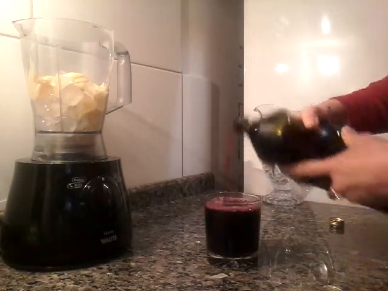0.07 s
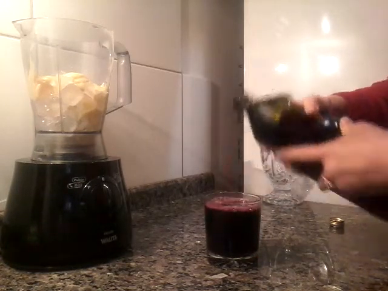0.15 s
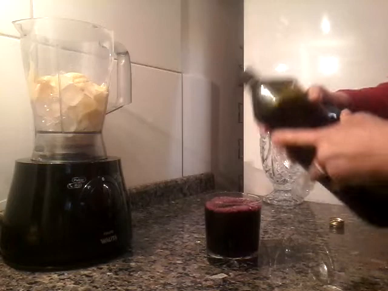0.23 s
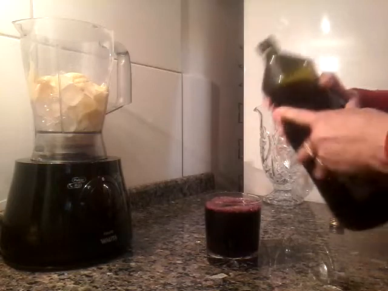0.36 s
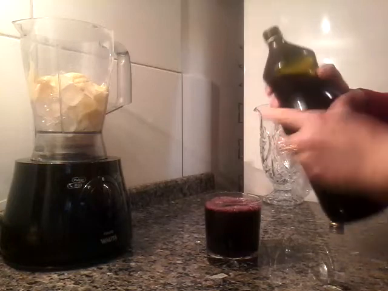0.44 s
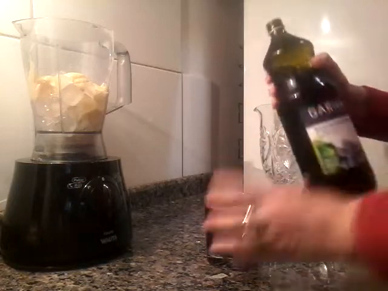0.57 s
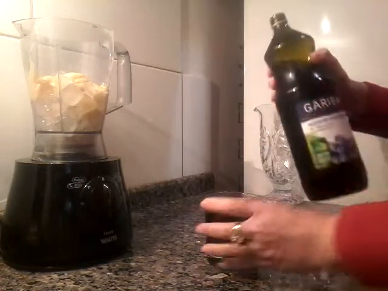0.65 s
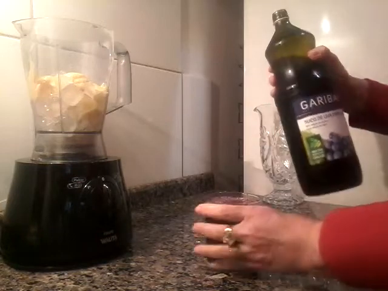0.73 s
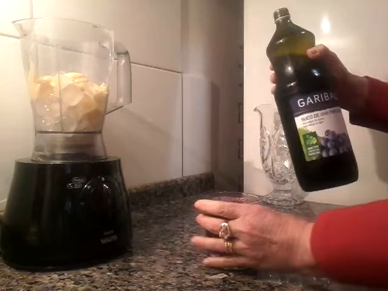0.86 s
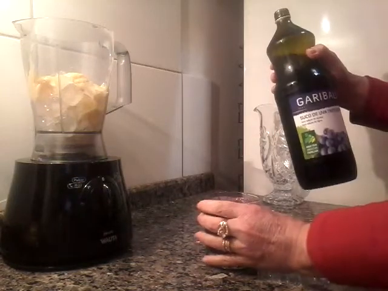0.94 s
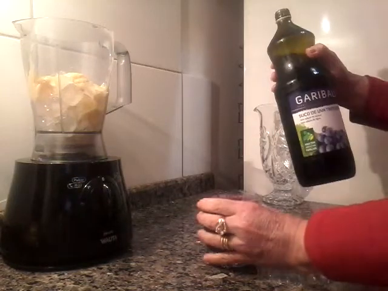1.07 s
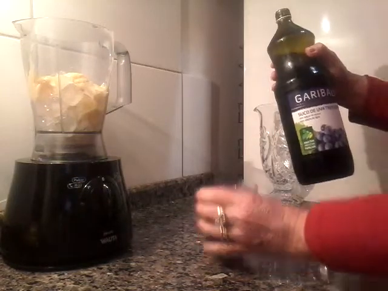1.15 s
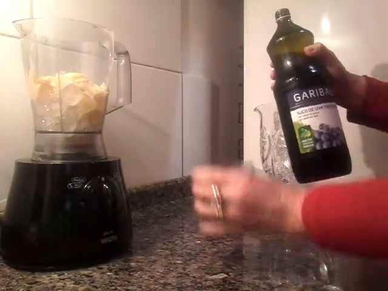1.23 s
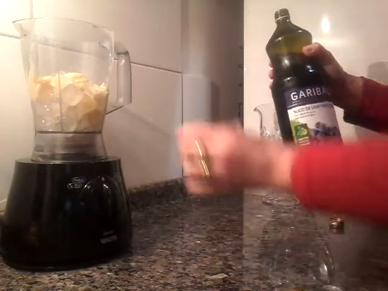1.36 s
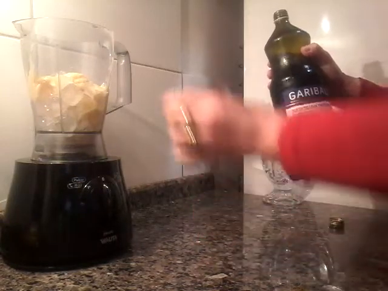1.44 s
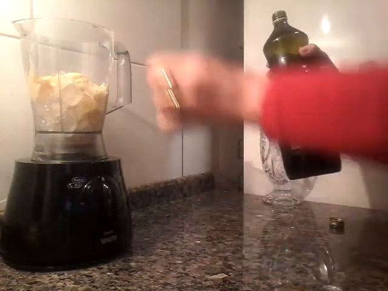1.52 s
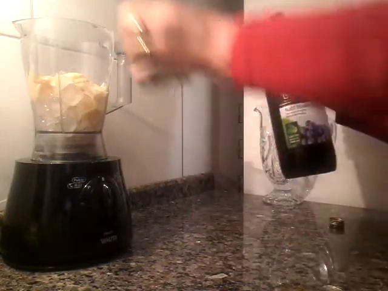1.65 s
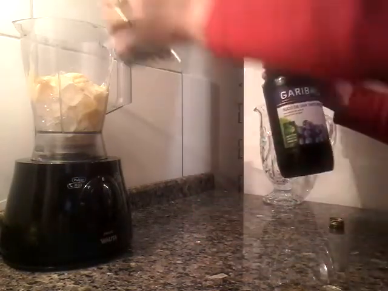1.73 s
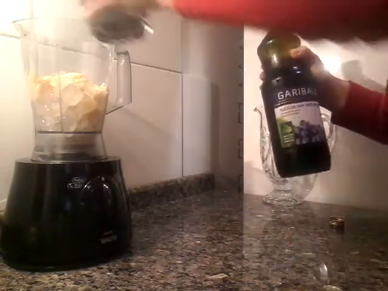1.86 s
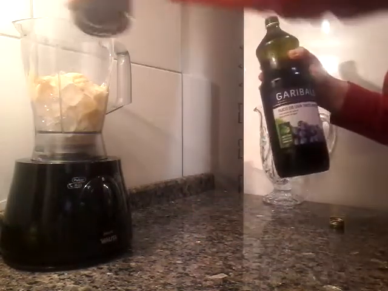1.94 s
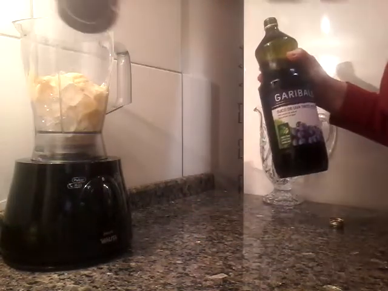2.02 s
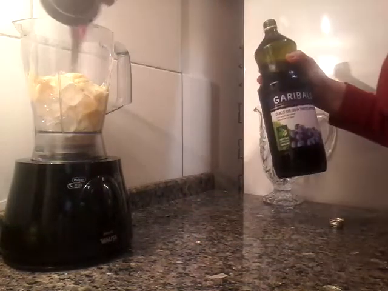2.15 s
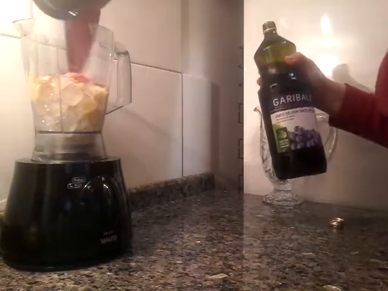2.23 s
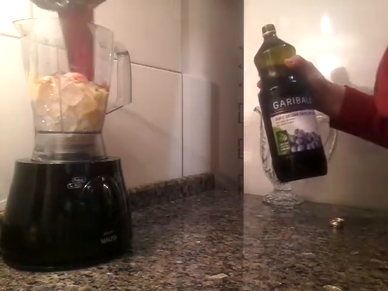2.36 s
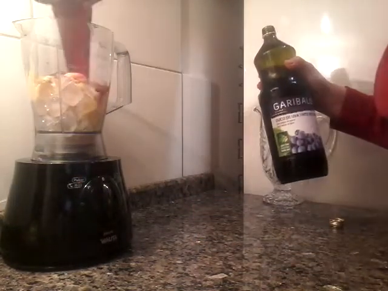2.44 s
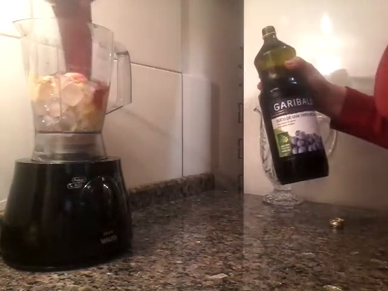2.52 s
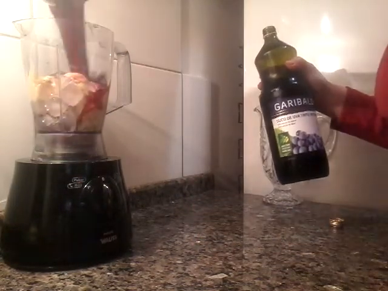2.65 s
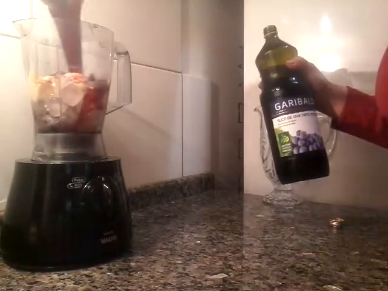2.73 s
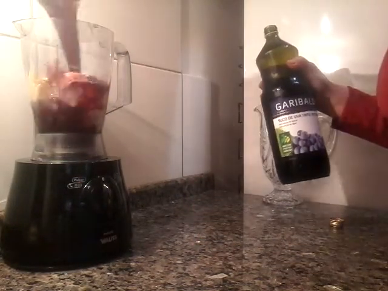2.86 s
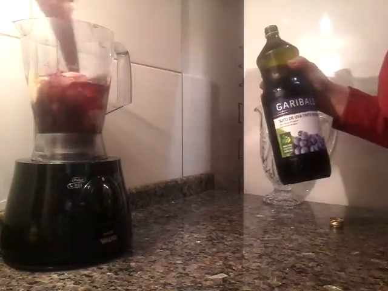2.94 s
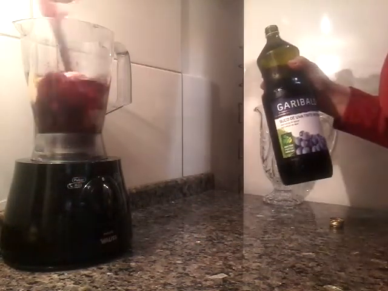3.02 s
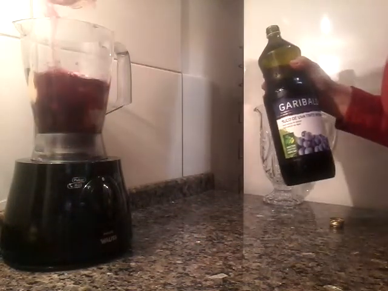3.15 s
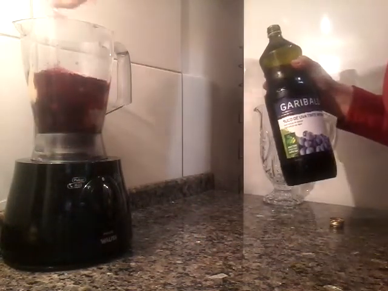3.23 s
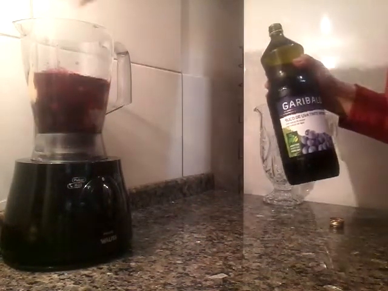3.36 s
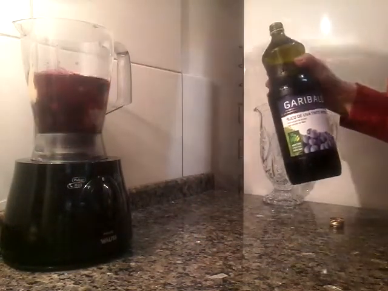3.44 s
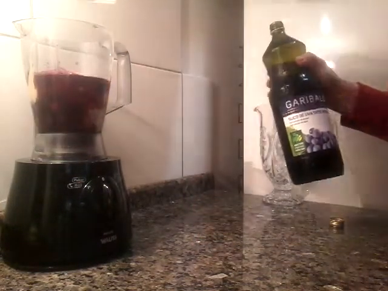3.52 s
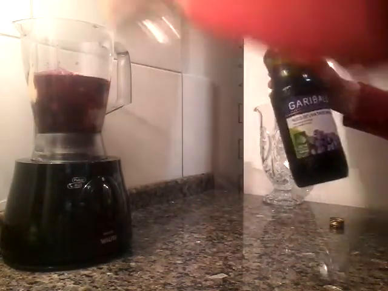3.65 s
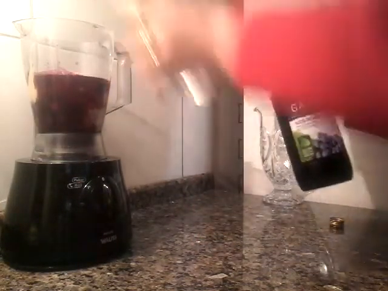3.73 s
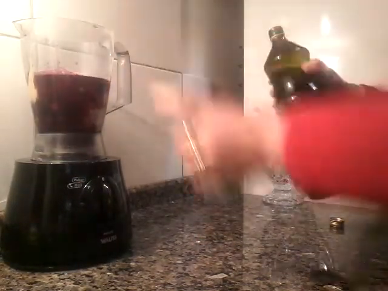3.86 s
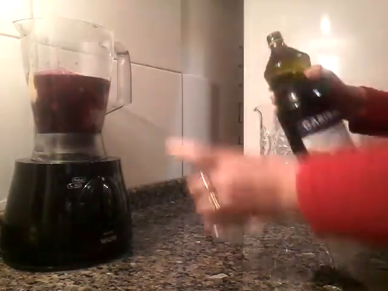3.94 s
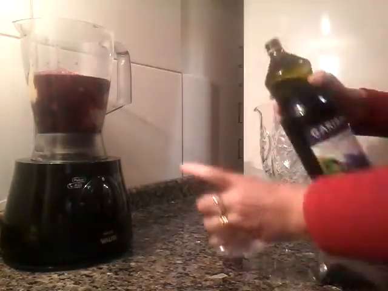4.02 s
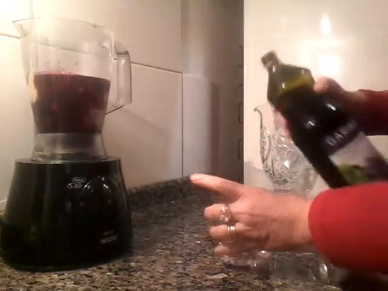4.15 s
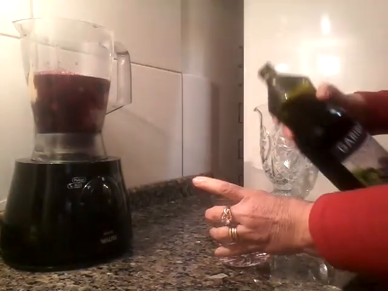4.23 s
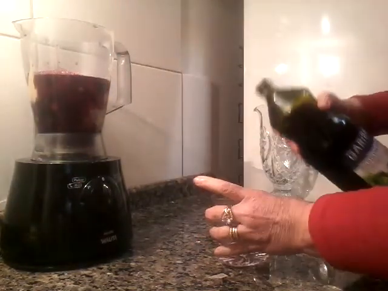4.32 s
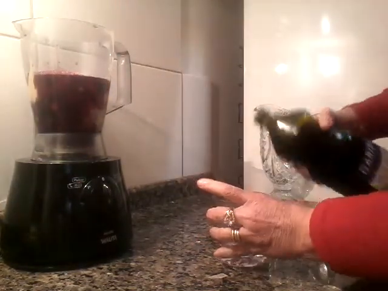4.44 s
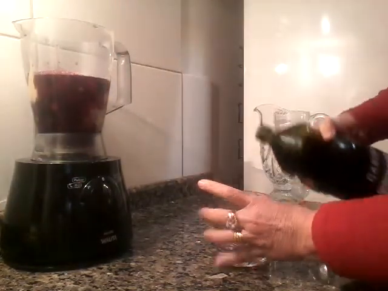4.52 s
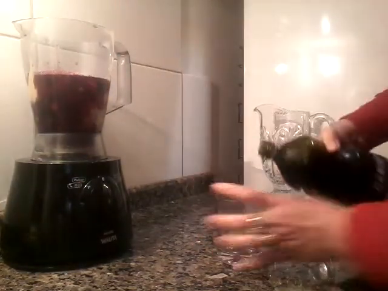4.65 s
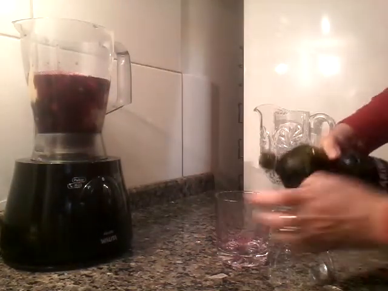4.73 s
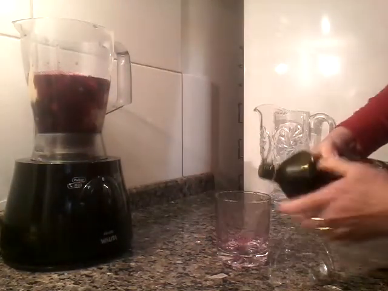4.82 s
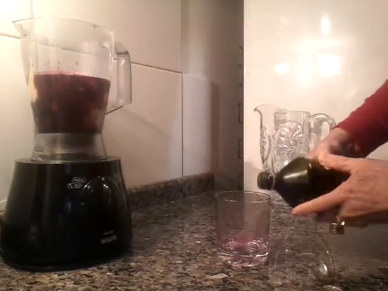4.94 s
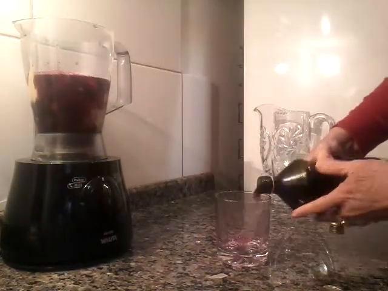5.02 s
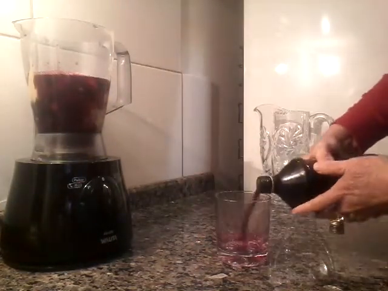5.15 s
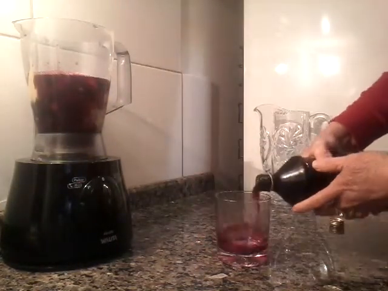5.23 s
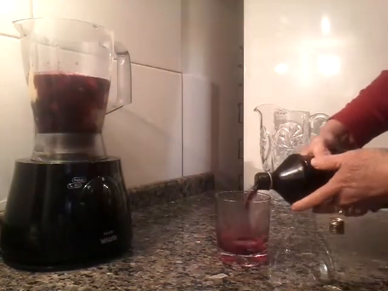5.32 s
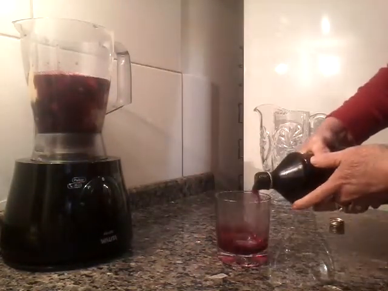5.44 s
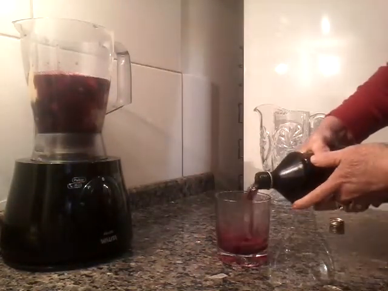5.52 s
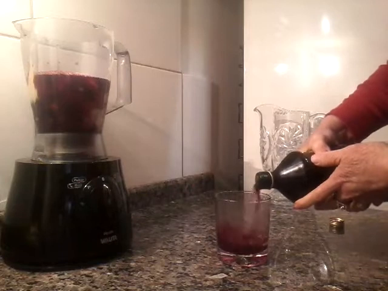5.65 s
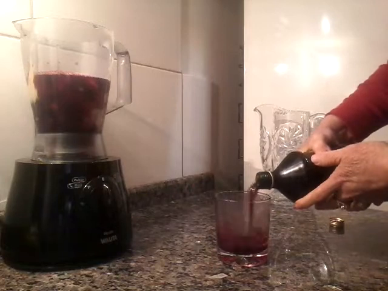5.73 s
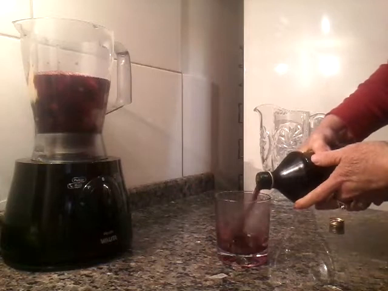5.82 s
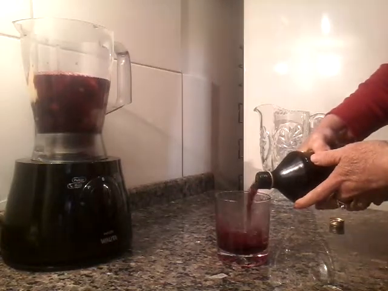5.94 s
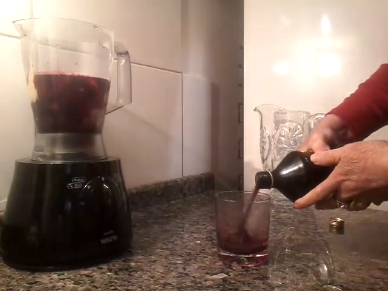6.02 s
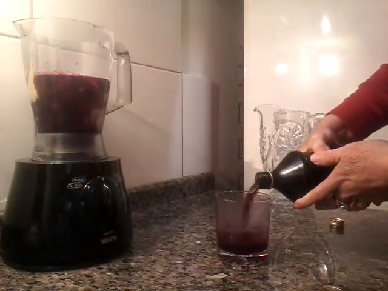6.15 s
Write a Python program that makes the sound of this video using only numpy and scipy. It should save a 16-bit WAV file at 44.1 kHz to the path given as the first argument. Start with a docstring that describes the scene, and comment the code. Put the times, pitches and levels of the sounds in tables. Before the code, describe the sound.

A few last soft glugs of juice leave a glass bottle, followed by light taps of a drinking glass being handled. The juice then rushes over fruit and ice in a blender jar, splashing and gurgling for about a second. After faint drips, the glass knocks twice on a stone counter and the bottle once, each with a short ring. The bottle starts glugging into the glass again. The sound is close, in a quiet tiled kitchen.

```python
"""The tiled corner of a kitchen, where grape juice is poured. The last glugs leave a bottle, then the full
glass is tipped over fruit and ice in a blender jar: ringing bubbles and a spray of tiny clicks. The empty
glass knocks twice on the stone counter and the bottle once, each with a thud, a ring and a low boom, and
the bottle starts to glug into the glass again. Foam fizzes in the jar and an appliance hums faintly."""
import sys
import numpy as np
from scipy import signal
from scipy.fft import rfft, irfft
from scipy.io import wavfile
from scipy.ndimage import uniform_filter1d

SR = 44100
rng = np.random.default_rng(int(sys.argv[2]) if len(sys.argv) > 2 else 0)


def waveform_to_disk(signal):
    """Save audio, clipped to [-1, 1], as 16-bit WAV at the path in sys.argv[1]."""
    frames = np.transpose(np.atleast_2d(signal))
    scaled = np.clip(frames, -1, 1) * 32767
    samples = np.round(scaled).astype(np.int16)
    wavfile.write(sys.argv[1], SR, samples)


N = 272538
TIME = np.arange(N) / SR


# The pour from the tipped glass into the jar. Each row: time in seconds, relative level in dB.
POUR_ENVELOPE = [(2.2, -65), (2.285, -49.5), (2.335, -38), (2.52, -42), (2.79, -40.5), (3.09, -45.5),
                 (3.2, -67), (3.48, -69.5), (3.55, -98)]

def stream(pool_start_s=2.25, pool_fill_s=0.22):
    """Juice hits fruit and ice as fine spray; as it pools, the spray softens and deep bubbles swell."""
    flow = from_db(np.interp(TIME, *np.transpose(POUR_ENVELOPE), left=-120, right=-120))
    pool = 1 - np.exp(-np.maximum(TIME - pool_start_s, 0) / pool_fill_s)
    gurgle = swarm(POUR_ENVELOPE, 226.7, 1164, cycles=33, spread_db=1, rise=0.045, count=700, tone=jar)
    splatter = swarm(POUR_ENVELOPE, 1241, 5850, cycles=90, spread_db=4, rise=0.04, count=3600, tone=jar)
    mist = swarm(POUR_ENVELOPE, 6270, 15460, cycles=130, spread_db=6.5, rise=0.033, count=6000, tone=jar)
    return flow * (from_db(-20 + 10 * pool) * gurgle
                   + from_db(-1.5 - 3 * pool) * splatter
                   + from_db(-5 - 3.5 * pool) * mist)


# The tone of splashing in the jar. Each row: frequency in Hz, gain in dB.
JAR_EQ = [(220, 7.5), (300, -5), (600, 4), (820, -3.5), (1000, 6), (1250, -7), (1700, 3.5), (3300, 2),
          (5500, 1.5), (9000, 2.5), (11000, -0.5), (15000, -6.5)]
# The jar's air column as it fills. Each row: time in seconds, first and second resonance in Hz.
JAR_RESONANCES = [(2.3, 432, 1380), (2.5, 435, 1630), (2.7, 666, 1690), (3.1, 757, 1650)]

def jar(s, hz, boost_db=11, sharpness=14):
    """Gain in dB for a bubble in the jar: it is louder near a resonance of the air column."""
    times, *resonances = np.transpose(JAR_RESONANCES)
    detunings = [np.log(hz / np.interp(s, times, sweep)) for sweep in resonances]
    return at_hz(JAR_EQ, hz) + sum(boost_db / (1 + (sharpness * detune) ** 2) for detune in detunings)


# Juice slapping down. Each row: start in seconds, relative spray and body levels in dB, bubble pitch in Hz.
SPLASH_CUES = [(.094, -40.5, -48, 1333), (.117, -32.5, -51.5, 1406), (.176, -33, -42.5, 2390),
               (.374, -52, -60, 2110), (.465, -47.5, -61.5, 2070), (.512, -51.5, -68, 2140),
               (.6, -63, -64, 4540), (2.219, -43, -48.5, 3520), (2.23, -32.5, -50, 1760),
               (2.292, -25, -39.5, 2466), (2.316, -29.5, -28.5, 3370), (2.349, -28, -30, 1560),
               (2.396, -31.5, -31.5, 1600), (2.612, -35.5, -35, 1800), (2.755, -50, -34, 2134),
               (2.823, -33.5, -60, 1680), (2.894, -35.5, -41, 1760), (3.025, -29.5, -60, 1680),
               (3.119, -35, -44, 3300), (5.396, -53.5, -71, 4120), (5.447, -51, -44, 4250),
               (5.6, -57, -54, 4570), (5.654, -45, -41.5, 4480), (5.669, -43, -37, 2595),
               (5.814, -48.5, -55, 4840), (5.872, -33.5, -33.5, 2730), (6.025, -39.5, -46, 2690),
               (6.078, -39.5, -56, 2230), (6.097, -38.5, -35.5, 2890)]

def splashes(level_db=-4):
    """A film of juice breaks into spray and traps a cluster of small bubbles and one lead bubble."""
    out = np.zeros(N)
    for s, spray_db, body_db, hz in SPLASH_CUES:
        add(out, s, from_db(spray_db) * spray(decay_s=0.0059))
        add(out, s, from_db(body_db - 1) * cluster(1990, 7860, decay_s=0.0074, cycles=174, count=26))
        add(out, s, from_db(body_db + 3) * bubble(hz, t60=110 / hz, rise=0.18, pinch_s=0.00021))
    return from_db(level_db) * out


# Big gurgles in the jar. Each row: start in seconds, pitch in Hz, relative level in dB.
POCKET_CUES = [(2.368, 1640, -36), (2.572, 359, -36.5), (2.68, 635, -33.5), (2.691, 1626, -32),
               (2.764, 561, -28.5), (2.79, 2040, -34), (3.096, 3340, -35)]

def air_pockets(level_db=-8.5):
    """The stream drags pockets of air under, and each stands out as a gulp."""
    out = np.zeros(N)
    for s, hz, db in POCKET_CUES:
        add(out, s, from_db(db) * gulp(hz, decay_s=0.013, lead_db=8.5, lead_t60=0.031))
    return from_db(level_db) * out


# Air glugging into the bottle. Each row: start in seconds, pitch in Hz, relative level in dB.
GLUG_CUES = [(0, 1100, -62), (0.18, 1774, -56), (0.208, 1103, -57.5), (5.656, 1290, -52), (5.909, 932, -50),
             (6.099, 1140, -42.5)]

def glugs(level_db=0.5, bottle_air_hz=836):
    """Each gulp at the neck also sets the air in the bottle ringing."""
    out = np.zeros(N)
    for s, hz, db in GLUG_CUES:
        add(out, s, from_db(db) * gulp(hz, decay_s=0.033, lead_db=10.5, lead_t60=0.0605))
        add(out, s, from_db(db + 0.5) * bubble(bottle_air_hz, t60=0.16, rise=0.2, pinch_s=0.012))
    return from_db(level_db) * out


# The pour pulsing at the bottle neck. Each row: start in seconds, relative level in dB.
NECK_PULSES = [(5.3, -51.5), (5.531, -51), (5.752, -46.5), (5.953, -43), (6.145, -52)]

def plops(level_db=-2, plop_hz=347, tick_hz=4420):
    """The neck closes with a low plop, a bright tick and a little spray."""
    out = np.zeros(N)
    for s, db in NECK_PULSES:
        tick = bubble(tick_hz * rng.uniform(0.9, 1.3), t60=0.017, rise=0.34, pinch_s=0.0004)
        add(out, s, from_db(db) * bubble(plop_hz, t60=0.043, rise=0.1, pinch_s=0.00036))
        add(out, s, from_db(db + 6.5) * tick)
        add(out, s, from_db(db - 3) * spray(decay_s=0.0025))
    return from_db(level_db) * out


def trickle(steady_db=-70, fall_s=0.096, swell_s=0.067):
    """Tiny bubbles fizz in the glass, swelling as a slug of juice lands after each pulse of the neck."""
    level = from_db(steady_db)
    for s, db in NECK_PULSES:
        age = np.maximum(TIME - s - fall_s, 0) / swell_s
        level = level + from_db(db - 8) * age * np.exp(1 - age ** 2) / 2
    fizz = swarm(NECK_PULSES, 1245, 13000, cycles=35, spread_db=5, rise=0.087, count=420)
    return level * butter(fizz, 4700, "low", order=1)


# Glass and bottle hitting the counter. Each row: start in seconds, relative thud level in dB,
# thud cut-off in Hz, then relative levels in dB of the glass ring, bottle ring and counter boom.
KNOCK_CUES = [(4.2478, -18, 2690, -4, -63, -51), (4.2635, -28, 2920, -29, -27, -30.5),
              (4.521, -25.5, 3140, -16, -31.5, -38.5), (4.5265, -38, 3300, -34, -54, -35.5),
              (5.073, -25, 3280, -32, -14, -29.5)]
# The modes of glass, bottle and counter. Each row: pitch in Hz, relative level in dB, t60 in seconds.
GLASS_MODES = [(720, -18, .2), (892, -11, .25), (1006, -11, .25), (1130, -11, .28), (1205, -12, .2),
               (1380, -17, .27), (1552, -19, .27), (2098, -12, .26), (2177, 1, .16), (2214, -11, .32),
               (2402, -16, .2), (3176, -18, .2), (3708, -23, .2), (11990, -33, .09), (14380, -29, .07)]
BOTTLE_MODES = [(380, -13, .25), (688, -6, .18), (783, -11, .2), (996, -1, .19), (1305, -14, .17),
                (2190, -14, .36), (2246, -4, .22), (2933, -2, .2), (3288, -8, .2), (3723, -11, .22),
                (4290, -25, .25), (4950, -26, .4), (5793, -22, .18), (6200, -26, .15), (9012, -31, .13),
                (10780, -31, .12)]
COUNTER_MODES = [(116.6, -2, 0.37), (135.2, -10.5, 0.5), (241.3, 10, 0.052), (252.4, 11, 0.2),
                 (373, -12, 0.14), (460.6, 0, 0.41)]

def knocks(level_db=-10, attack_s=0.0017):
    """Each blow sets the glassware ringing and the counter booming."""
    out = np.zeros(N)
    glass, bottle, counter = ring(GLASS_MODES), ring(BOTTLE_MODES), ring(COUNTER_MODES)
    for s, _, _, glass_db, bottle_db, boom_db in KNOCK_CUES:
        blow = from_db(glass_db) * glass + from_db(bottle_db) * bottle + from_db(boom_db) * counter
        add(out, s, blow * (1 - np.exp(-TIME[:SR] / attack_s)))
    return from_db(level_db) * out


# The dense ring of stone and glassware under a blow. Each row: frequency in Hz, gain in dB.
THUD_EQ = [(100, -17), (170, -36.5), (240, -35), (370, -4), (560, -7), (740, 0.5), (1100, 1), (1700, -4),
           (2300, 3.5), (3200, -2), (4600, -6.5), (6500, -14), (10000, -8.5), (15000, -1.5)]

def thuds(level_db=7, t60=0.048, attack_s=0.0014):
    """Glass meets stone: a dense, short thud, each with its own level and brightness."""
    out, t = np.zeros(N), TIME[:SR]
    envelope = die_away(t, t60) * (1 - np.exp(-t / attack_s))
    for s, db, cutoff_hz, *_ in KNOCK_CUES:
        thud = rms_one(butter(coloured_noise(THUD_EQ, SR), cutoff_hz, "low"))
        add(out, s, from_db(db) * thud * envelope)
    return from_db(level_db) * out


# Light taps. Each row: start in seconds, relative level in dB, rough pitch in Hz.
TAP_CUES = [(0.984, -49, 830), (1.058, -56.5, 5000), (1.372, -54, 1480), (3.296, -51, 765),
            (3.372, -52.5, 1350), (3.43, -51.5, 1150), (3.468, -50.5, 1550), (3.991, -43, 2300),
            (4.066, -48.5, 2720), (4.082, -46, 1900), (4.119, -52.5, 1440)]

def taps(level_db=-3, decay_s=0.00934):
    """Soft, short taps: glassware being handled, and drips or ice settling in the jar."""
    out, t = np.zeros(N), TIME[:SR // 4]
    for s, db, hz in TAP_CUES:
        tap = butter(rng.standard_normal(len(t)), [hz / 1.94, hz * 1.53], "band")
        add(out, s, from_db(db) * rms_one(tap) * np.exp(-t / decay_s))
    return from_db(level_db) * out


# The hand sliding on the glass. Each row: start in seconds, level in dB.
SWISH_CUES = [(1.001, -60), (4.113, -60.5)]

def swishes():
    """Skin slips over glass in many tiny catches: a thin swish."""
    out = np.zeros(N)
    for s, db in SWISH_CUES:
        add(out, s, from_db(db) * spray(decay_s=0.025, centre_hz=11000, attack_s=0.004))
    return out


# Dripping during and after the pours. Each row: start and end in seconds.
DRIP_SPANS = [(0.201, 1.5), (3.1, 3.7), (5.25, 6.18)]

def drips(level_db=-61, spread_db=2, drops_per_span=5):
    """Stray drops land at random moments as faint ticks."""
    out = np.zeros(N)
    for start, end in DRIP_SPANS:
        for s in rng.uniform(start, end, drops_per_span):
            add(out, s, from_db(level_db + spread_db * rng.standard_normal()) * spray(decay_s=0.0013))
    return out


def foam(start_s=3.2, start_db=-75, growth_db_per_s=1):
    """After the pour, tiny bubbles pop in the jar with a faint, high fizz that slowly grows."""
    pops = grains(per_s=340, spread_db=1, size=N)
    fizz = rms_one(resonate(pops, 10400, width_hz=2600))
    age = TIME - start_s
    return from_db(start_db + growth_db_per_s * age) * fizz * (age > 0)


# Early reflections off the tiles. Each row: delay in seconds, level in dB.
TILE_ECHOES = [(.0023, -27.5), (.0038, -24.5), (.0063, -38.5), (.0097, -19)]
# The reverb tail. Each row: frequency in Hz, t60 in seconds.
TAIL_DECAY = [(250, 0.48), (1000, 0.44), (2200, 0.39), (5000, 0.4), (10000, .24), (15000, 0.25)]

def kitchen(dry, tail_db, attack_s=0.00047):
    """Close tiled walls throw back a few echoes, then a diffuse tail that dies sooner in the treble."""
    t = TIME[:SR * 3 // 4]
    edges_hz, tail = np.geomspace(280, 18000, 9), 0
    for low, high in zip(edges_hz, edges_hz[1:]):
        band = butter(rng.standard_normal(len(t)), [low, high], "band")
        tail = tail + band * die_away(t, at_hz(TAIL_DECAY, np.sqrt(low * high)))
    tail = tail * (1 - np.exp(-t / attack_s))
    response = from_db(tail_db) * tail / np.sqrt(np.sum(tail ** 2))
    response[0] += 1   # the direct sound
    for s, db in TILE_ECHOES:
        add(response, s, from_db([db]))
    return signal.fftconvolve(dry, response)[:N]


# The appliance's hum. Each row: pitch in Hz, level in dB.
HUM_TONES = [(118.6, -74.5), (183, -86.5), (274.5, -88.5), (355.3, -78), (543.7, -82)]
# The tone of the room's air. Each row: frequency in Hz, gain in dB.
AIR_EQ = [(25, -1.5), (60, 2.5), (120, -7), (220, -3), (380, -4), (700, -4.5), (1200, -6), (1800, -11.5),
          (3200, -13), (6000, -17), (10000, -20), (13000, -42.5)]

def room_tone(air_db=-70, waver=0.36, waver_hz=3):
    """Still room air and the slightly wavering hum of an appliance."""
    hum = 0
    for hz, db in HUM_TONES:
        swell = 1 + waver * rms_one(butter(rng.standard_normal(N), waver_hz, "low"))
        hum = hum + np.sqrt(2) * from_db(db) * swell * np.sin(2 * np.pi * (hz * TIME + rng.random()))
    return hum + from_db(air_db) * coloured_noise(AIR_EQ, N)


def bubble(hz, t60, rise, pinch_s):
    """A bubble pinches off and rings at its own pitch, which climbs as it nears the surface."""
    t = TIME[:int(t60 * SR) + 1]
    chirp = np.sin(2 * np.pi * hz * t * (1 + rise * t / t60 / 2))
    return chirp * die_away(t, t60) * (1 - np.exp(-t / pinch_s))


def swarm(cues, low_hz, high_hz, cycles, spread_db, rise, count, tone=None):
    """Bubbles of random pitch, born between the first cue and the last; running rms near 1."""
    when, pitch, size = rng.random((count, 3)).T
    births = cues[0][0] + when * (cues[-1][0] - cues[0][0])
    pitches = low_hz * (high_hz / low_hz) ** pitch
    levels = spread_db * np.minimum(-np.log(1 - size), 4) + (tone(births, pitches) if tone else 0)
    out = np.zeros(N)
    for s, hz, db in zip(births, pitches, levels):
        add(out, s, from_db(db) * hz / low_hz * bubble(hz, cycles / hz, rise, pinch_s=0.33 / hz))
    running_power = np.abs(uniform_filter1d(out ** 2, size=3500))
    return out / np.sqrt(running_power + 1e-6)


def cluster(low_hz, high_hz, decay_s, cycles, count):
    """A handful of bubbles that swells and thins; as strong as a unit sound dying over decay_s."""
    out = np.zeros(SR // 4)
    for when, pitch, size in rng.random((count, 3)):
        s = min(-decay_s * np.log(1 - when), 0.2)
        hz = low_hz * (high_hz / low_hz) ** pitch
        strength = size * np.sqrt(when) * (1 - when)
        add(out, s, strength * bubble(hz, cycles / hz, rise=0.15, pinch_s=0.1 / hz))
    return out * np.sqrt(decay_s * SR / 2 / np.sum(out ** 2))


def gulp(hz, decay_s, lead_db, lead_t60):
    """A pocket of air rings as one large bubble and breaks into a cluster around the same pitch."""
    out = cluster(hz / 1.24, hz * 1.506, decay_s, cycles=40, count=14)
    add(out, 0, from_db(lead_db) * bubble(hz, lead_t60, rise=0.31, pinch_s=0.0002))
    return out


def spray(decay_s, centre_hz=9320, attack_s=0.0025):
    """A quickly thinning shower of tiny clicks; as strong as a unit sound dying over decay_s."""
    t = TIME[:SR // 4]
    fade = np.exp(-t / decay_s)
    drops = grains(per_s=7000, spread_db=5.7, size=len(t)) * fade * (1 - np.exp(-t / attack_s))
    return rms_one(resonate(drops, centre_hz, width_hz=2200)) * np.sqrt(np.mean(fade ** 2))


def ring(modes):
    """One second of a struck body's modes, alternating in sign."""
    t = TIME[:SR]
    return sum((-1) ** k * from_db(db) * die_away(t, t60) * np.sin(2 * np.pi * hz * t)
               for k, (hz, db, t60) in enumerate(modes))


def grains(per_s, spread_db, size):
    """Random clicks of uneven size and sign."""
    strengths = from_db(spread_db * np.minimum(rng.exponential(1, size), 4))
    return (rng.random(size) < per_s / SR) * strengths * rng.choice([-1, 1], size)


def coloured_noise(eq, size):
    """Steady noise shaped by an EQ curve; rms 1."""
    gains = from_db(at_hz(eq, np.fft.rfftfreq(size, 1 / SR)))
    return rms_one(irfft(rfft(rng.standard_normal(size)) * gains, size))


def resonate(x, hz, width_hz):
    """A resonance with gain 1 at its peak."""
    r = np.exp(-np.pi * width_hz / SR)
    feedback = [1, -2 * r * np.cos(2 * np.pi * hz / SR), r * r]
    return signal.lfilter(np.array([1, 0, -1]) * (1 - r * r) / 2, feedback, x + 1e-18)


def butter(x, hz, kind, order=2):
    return signal.sosfilt(signal.butter(order, np.clip(hz, 10, .45 * SR), kind, fs=SR, output="sos"), x)


def at_hz(curve, hz):
    """Read a curve on a log-frequency axis."""
    frequencies, values = np.transpose(curve)
    return np.interp(np.log(np.maximum(hz, 1)), np.log(frequencies), values)


def add(track, s, sound):
    """Mix a sound into the track at time s."""
    start = max(round(s * SR), 0)
    track[start:start + len(sound)] += sound[:len(track) - start]


def die_away(t, t60):
    return from_db(-60 * t / t60)


def from_db(db):
    return 10 ** (np.asarray(db) / 20)


def rms_one(x):
    return x / np.sqrt(np.mean(x ** 2) + 1e-20)


def scene():
    """Juice, short contacts and ringing knocks sound in the tiled corner, over the room tone."""
    juice = splashes() + glugs() + plops() + trickle() + stream() + air_pockets() + drips() + foam()
    juice = butter(juice, 221, "high")
    contacts = thuds() + taps() + swishes()
    room = kitchen(juice, tail_db=-5) + kitchen(contacts, tail_db=-5) + kitchen(knocks(), tail_db=-11)
    return (room + room_tone())[None]


def record(dry, hiss_db=-71.5, low_cut_hz=90, port_hz=9700, high_cut_hz=16150):
    """A small microphone hisses, loses the deep bass and resonates at its port; the very top is cut."""
    hiss = from_db(hiss_db) * butter(rng.standard_normal(N), 13000, "low", order=1)
    heard = butter(dry, low_cut_hz, "high", order=1) + hiss
    coloured = heard + from_db(9) * resonate(heard, port_hz, width_hz=1300)
    return signal.sosfilt(signal.ellip(10, .2, 70, high_cut_hz, fs=SR, output="sos"), coloured)


dry = scene()
out = record(dry)
waveform_to_disk(out)
```